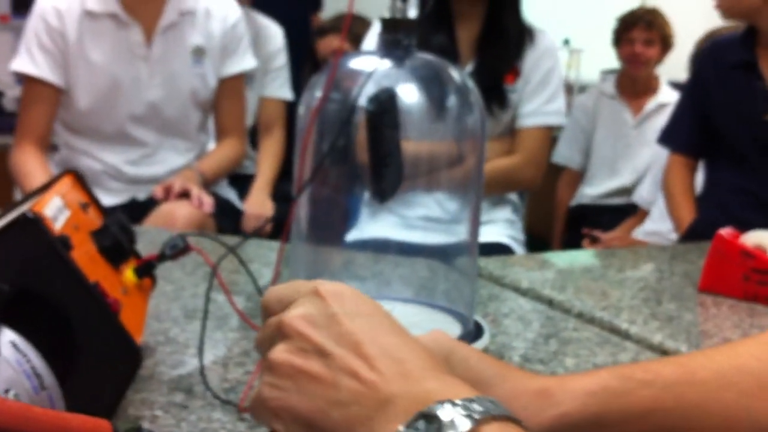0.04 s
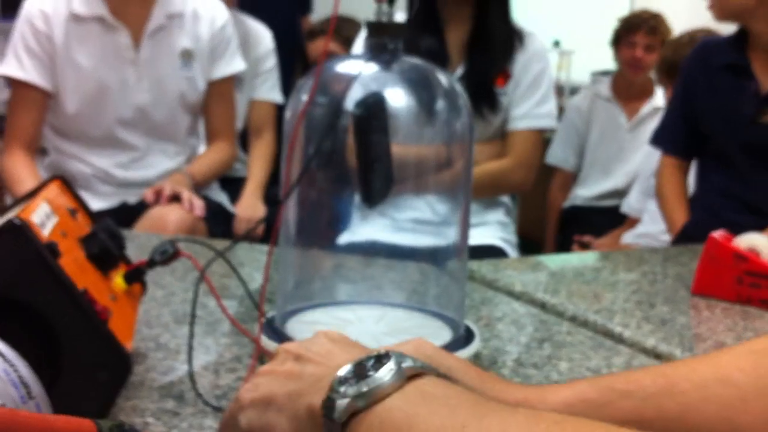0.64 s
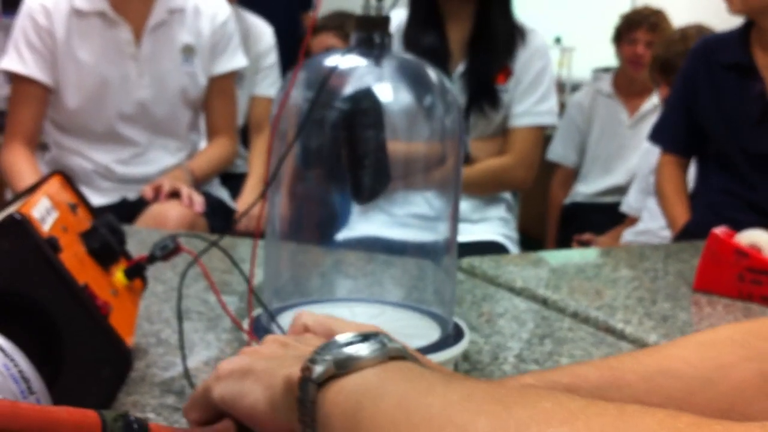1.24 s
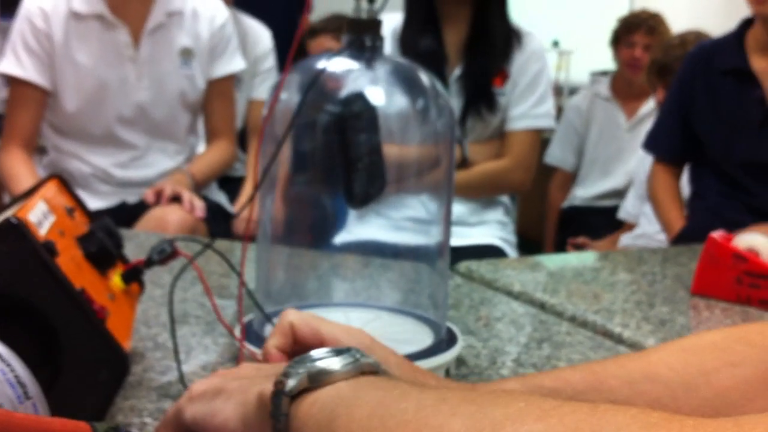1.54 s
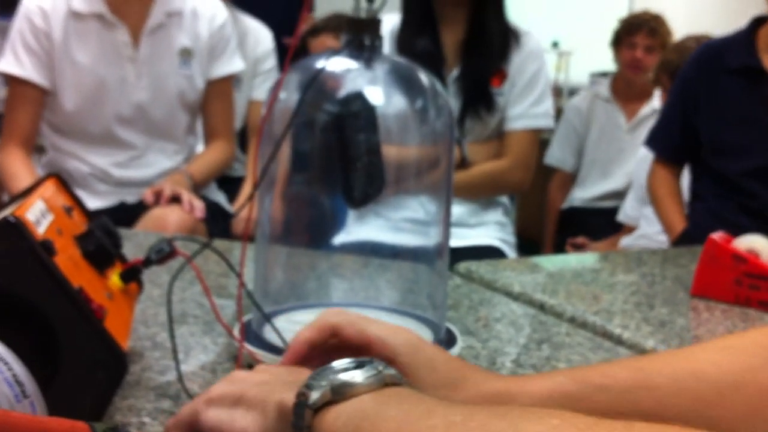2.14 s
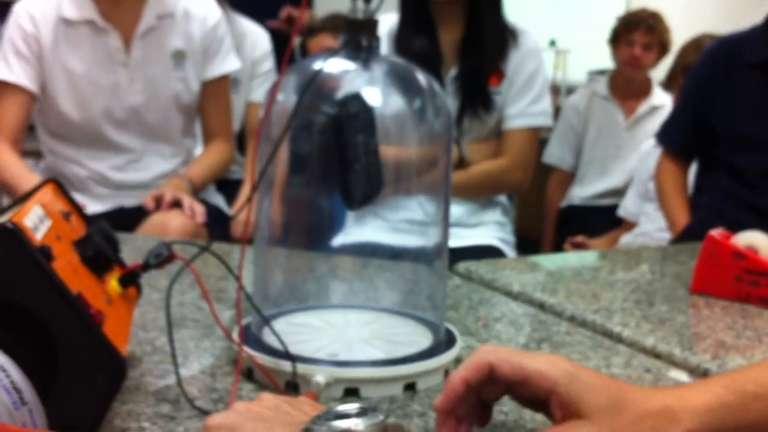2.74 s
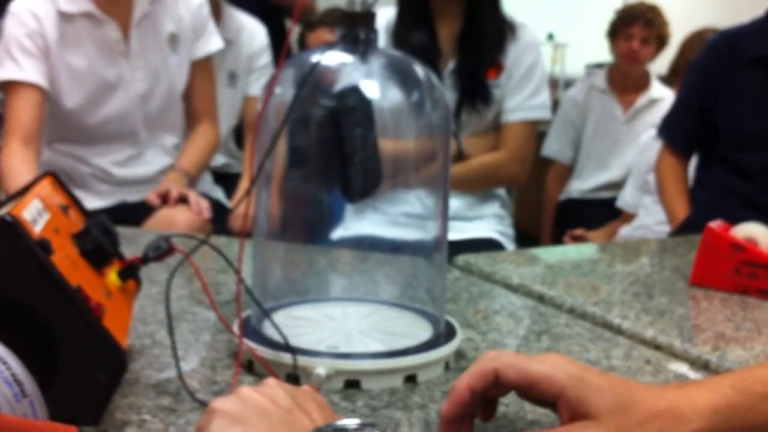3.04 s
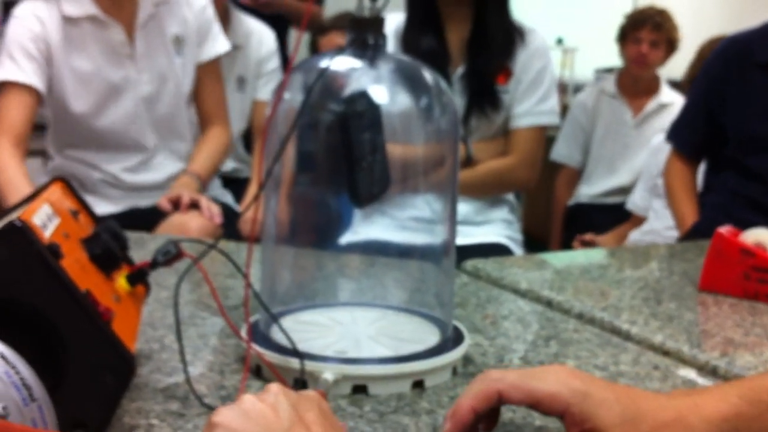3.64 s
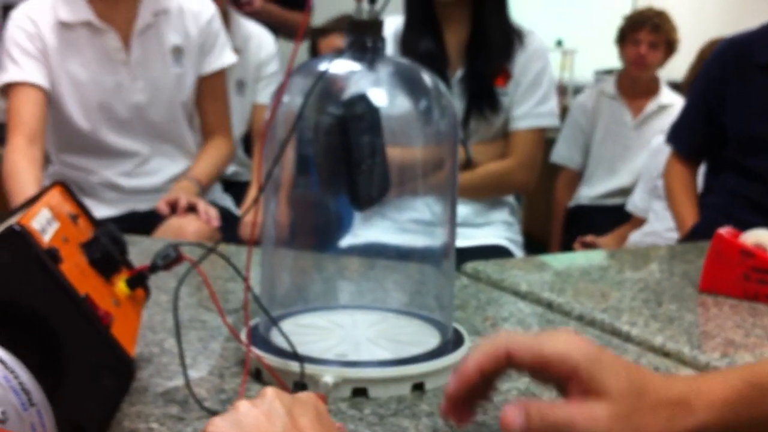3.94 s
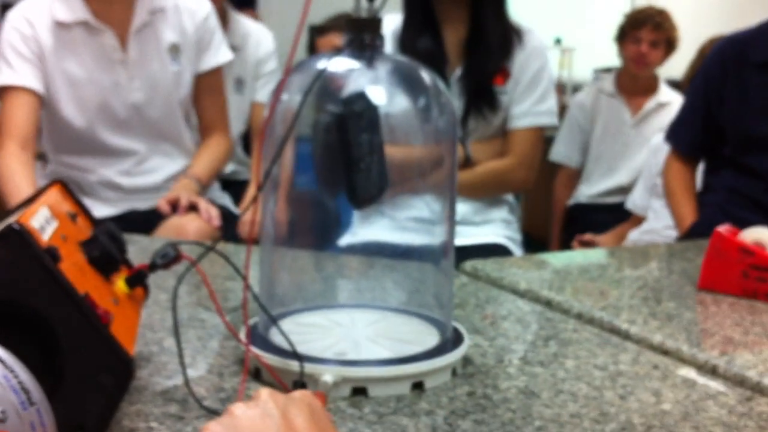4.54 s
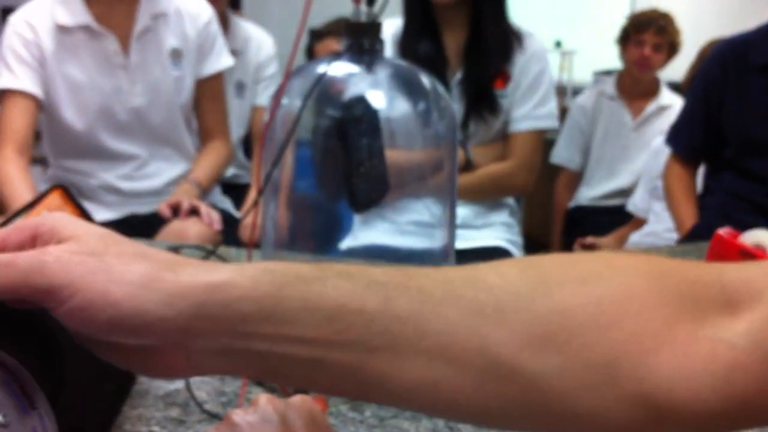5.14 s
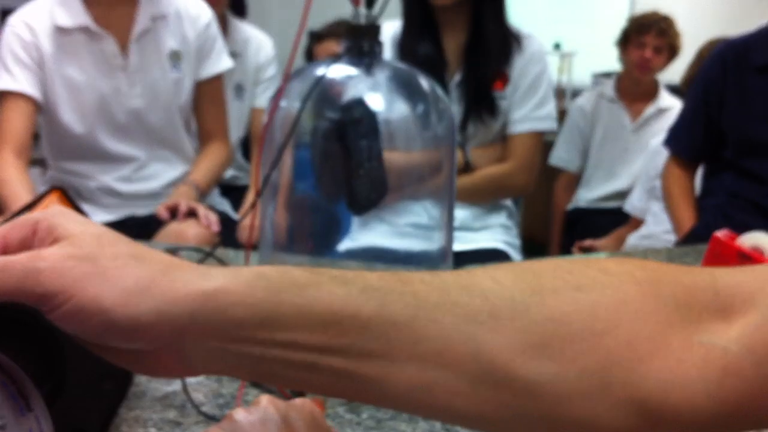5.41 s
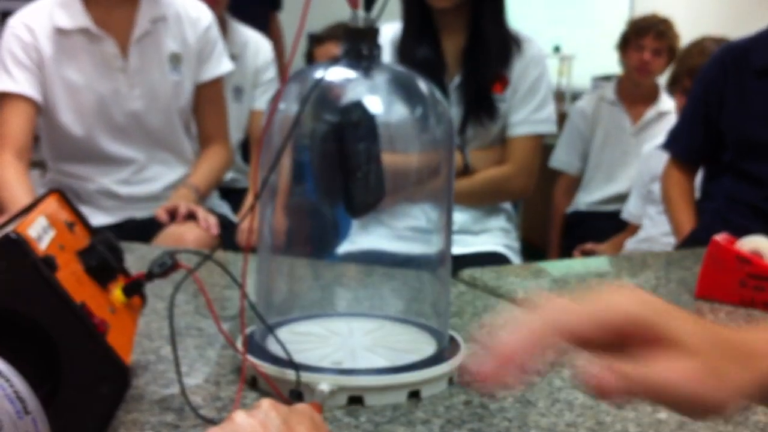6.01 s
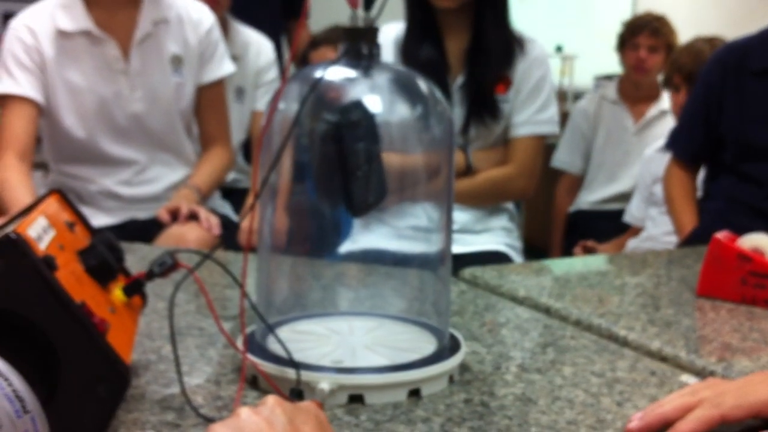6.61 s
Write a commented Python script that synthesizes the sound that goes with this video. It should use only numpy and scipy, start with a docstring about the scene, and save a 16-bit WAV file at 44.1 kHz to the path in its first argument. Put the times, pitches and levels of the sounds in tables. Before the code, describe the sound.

Fast metallic clatter and motor whine from a running vacuum pump, cut off by a sharp switch click and a brief rasp.

```python
"""Vacuum pump in a classroom

A small pump runs on a bench: its mains motor whines, a thin whistle wavers, and it clacks twice per
shaft turn, each clack ringing its metal casing. There is one soft bump, and after two seconds the
casing starts to rattle harder. A switch snaps, the shaft stalls in about a tenth of a second with a
last bright rasp, and the room's ventilation is left."""
import sys
import numpy as np
from scipy import signal
from scipy.fft import rfft, irfft, next_fast_len
from scipy.io import wavfile
from scipy.ndimage import map_coordinates

SR = 44100
rng = np.random.default_rng(int(sys.argv[2]) if len(sys.argv) > 2 else 0)


def transcribe(u):
    """Save the signal u as a 16-bit wav file named by the first command-line argument.

    u: samples, shape (n,) or (channels, n), limited to [-1, 1]; the rate is SR.
    q: integer samples, one column per channel.
    """
    v = np.clip(np.atleast_2d(u).T, -1, 1)
    q = np.round(v * 32767).astype(np.int16)
    wavfile.write(sys.argv[1], SR, q)


N = 298557

# Levels in the tables are relative. A fade_s is the time a sound takes to fall by 60 dB.
# Magnetic tones of the motor: shaft_multiple, mains_multiple, start_level_db, loaded_level_db
WHINE_TONES = [(30, 0, -61.5, -60), (29, 2, -64, -78), (30, 2, -52, -48.5), (29, 4, -63, -52),
               (30, 4, -60, -48), (30, 6, -56.5, -55), (0, 2, -63.5, -62.5)]
# Air stirred by the spinning motor: pitch_hz, level_db
MOTOR_AIR = [(300, -16), (600, -14.5), (900, -2.5), (1200, -11), (2000, -9.5), (2600, -13), (4500, -10.5),
             (7000, -26), (15000, -28.5)]
# Rush of the ventilation: pitch_hz, level_db
VENT_AIR = [(15, -74), (25, -49), (70, -25), (84, -18.5), (144, -3), (170, -4), (307, -5.5), (437, -16),
            (620, -7), (710, -11), (812, -10.5), (955, -13), (1280, -14.5), (2660, -29), (15800, -37)]
# Hum of the ventilation fan: pitch_hz, level_db
FAN_TONES = [(100, -65.5), (147, -64.5), (200, -63.5), (810, -68)]
# Pump strokes that barely catch: start_s, change_db
WEAK_STROKES = [(.04, -3.5), (.678, -5), (2.208, -6), (2.292, -22), (2.781, -8), (2.93, -6), (2.973, -4),
                (3.739, -3), (3.994, -4), (4.398, -20), (4.845, -6.5), (5.546, -15)]
# Notes the pump casing rings at: pitch_hz, width_hz, tight_level_db, loose_level_db
CASING_NOTES = [(1537, 120, -20.5, -16), (1778, 31, -15.5, -5), (2010.7, 34.7, -9, 3), (2134, 45, -26, -11),
                (2214, 25, -17.5, -12), (2685, 27.5, -10.5, -10.5), (3417, 130, -11, -10.5),
                (3643, 87, -10, -10.5), (3806, 32, -4.5, -6), (4140, 54, -13.5, -13),
                (4427, 46, -3.5, -1.6), (4553, 112, -16.5, -7), (4840, 104, -11.5, -18),
                (5130, 98, -11.5, -10.5), (5558, 55.5, -3.5, -4), (5854, 69, -4, 0.0), (6130, 60, -26, -11),
                (6400, 51, -10, -4), (6680, 130, -33.7, -14.5), (6940, 37, -18.5, -15.5),
                (7390, 44, -15.5, -11.5), (8570, 71, -47, -20), (8640, 67, -24, -27.5),
                (10560, 97, -29, -25.5), (11030, 110, -29, -30), (12040, 77, -42, -20),
                (13150, 260, -36, -24), (13660, 130, -33, -19), (14666, 202, -39, -29)]
# Gritty noise in each clack: pitch_hz, level_db
CLATTER_NOISE = [(1000, -44), (1500, -7.5), (2300, -16), (2900, -6), (3400, -3), (4600, -5), (6300, -10.5),
                 (7500, -4.5), (10500, -12.5), (11600, -20.5), (13400, -8), (15800, -36)]
# How long the classroom echoes: pitch_hz, fade_s
ROOM_FADE = [(200, 0.24), (2000, 0.4), (6000, 0.26), (14000, 0.11)]
# Crack of the switch: pitch_hz, level_db
SNAP_NOISE = [(240, -62), (400, -29), (812, -16), (1070, -11.5), (1600, -9), (2570, -19), (3720, -9),
              (4620, -31), (5470, -15), (6470, -15), (8410, -12.5), (15800, -24)]
# Notes the switch lever rings at: pitch_hz, level_db, fade_s
LEVER_NOTES = [(918, -3, 0.06), (1115, -8.5, 0.09), (1414, 9, 0.024), (1625, 6.5, 0.037), (3830, -9, 0.06)]
# Rasp of the stalling pump: pitch_hz, level_db
RASP_NOISE = [(410, -47), (700, -15), (862, -22), (1590, -16), (2070, -8.5), (2450, -15), (4400, -7.5),
              (4820, -8), (5640, -10), (13300, -13), (15800, -30)]
# Scrapes that make up that rasp: start_s, level_db, rise_s, fade_s
STALL_SCRAPES = [(5.637, -21.5, 0.0032, 0.073), (5.643, -16, 0.0086, 0.038), (5.661, -39, 0.0022, 0.11)]
# Metal parts that ring at the stall: pitch_hz, level_db, fade_s
STALL_NOTES = [(874, -12, 0.15), (2064, -9, 0.11), (3750, -5, .06), (4880, 8, 0.038), (5300, -20, 0.3),
               (7600, 4.5, 0.048), (8760, 1, .06), (10560, -6, 0.1)]

MAINS_HZ, RUN_HZ = 50, 23.523  # mains cycles and shaft turns per second
LOOSE_S, DRAG_HZ = 2.155, .019  # the casing shakes loose and slows the shaft a little
SNAP_S, POWER_OFF_S = 5.5542, 5.56
COAST_S, BRAKE_HZ_PER_S, REST_S = 5.549, 136, 5.66  # friction slows the shaft until it sticks


def amp(db):
    """Turn decibels into a gain to multiply by."""
    return 10 ** (np.asarray(db) / 20)


def unit(x):
    """Scale a sound to an average (rms) level of 1."""
    return x / np.sqrt(np.mean(x ** 2) + 1e-20)


def clock(size=N):
    """The time of each sample, in seconds."""
    return np.arange(size) / SR


def along(table, hz):
    """Read between the rows of a (pitch_hz, value) table, on a log pitch scale."""
    pitches, values = np.transpose(table)
    return np.interp(np.log(hz + 1), np.log(pitches + 1), values)


def wobble(rate):
    """A smooth curve through `rate` random points a second."""
    return map_coordinates(rng.standard_normal(int(N * rate / SR) + 4), [clock() * rate])


def filtered(x, gain_at):
    """Turn each frequency of x up or down by gain_at(hz)."""
    size = next_fast_len(N + SR // 2)
    return irfft(rfft(x, size) * gain_at(np.fft.rfftfreq(size, 1 / SR)), size)[:N]


def noise(table):
    """Noise at level 1, shaped by a (pitch_hz, level_db) table."""
    return unit(filtered(rng.standard_normal(N), lambda hz: amp(along(table, hz))))


def burst(t, rise_s, fade_s):
    """Loudness of a hit at t = 0: it rises fast, then dies away."""
    t = np.maximum(t, 0)
    return (1 - np.exp(-t / rise_s)) * np.exp(-np.log(1000) * t / fade_s)


def ringing(notes, start_s):
    """A struck part rings with several fading notes at once."""
    t = clock() - start_s
    return sum(amp(db) * burst(t, .001, fade_s) * np.sin(2 * np.pi * hz * t) for hz, db, fade_s in notes)


def shaft_speed(t):
    """Turns a second: steady under power, then slowing evenly until the shaft sticks."""
    running = RUN_HZ - DRAG_HZ * (t > LOOSE_S)
    return (running - BRAKE_HZ_PER_S * np.maximum(t - COAST_S, 0)) * (t < REST_S)


def shaft_turns():
    """How many turns the shaft has made so far."""
    return np.cumsum(shaft_speed(clock())) / SR


def motor(air_db=-49, waver_db=1.43):
    """Slots in the rotor pass through the mains field and whine; the spinning also stirs the air."""
    t, turns = clock(), shaft_turns()
    load = np.clip(t / POWER_OFF_S, 0, 1)
    whine = np.zeros(N)
    for shaft_multiple, mains_multiple, start_db, loaded_db in WHINE_TONES:
        cycles = shaft_multiple * turns + mains_multiple * MAINS_HZ * t + rng.random()
        level_db = start_db + load * (loaded_db - start_db) + waver_db * wobble(7)
        whine += np.sqrt(2) * amp(level_db) * np.sin(2 * np.pi * cycles)
    current = np.exp(-np.maximum(t - POWER_OFF_S, 0) / .0099)
    air = amp(air_db + 3.5 * load) * shaft_speed(t) / RUN_HZ * noise(MOTOR_AIR)
    return whine * current + air


def whistle(level_db=-60, pitch_hz=2690, width_hz=25):
    """A narrow band of noise makes a thin, wavering whistle while the shaft turns."""
    tone = filtered(rng.standard_normal(N), lambda hz: 1 / (1 + ((hz - pitch_hz) / width_hz) ** 2))
    return amp(level_db) * shaft_speed(clock()) / RUN_HZ * unit(tone)


def ventilation(air_db=-53.5):
    """A steady rush of air with a few unsteady fan tones."""
    hum = sum(amp(db + 3.3 * wobble(6)) * np.sin(2 * np.pi * hz * clock() + wobble(6))
              for hz, db in FAN_TONES)
    return amp(air_db) * noise(VENT_AIR) + hum


def stroke_times(limp_s=.00026, jitter_s=.000045):
    """The pump clacks twice a turn, with a slight limp: one early, the next late."""
    strokes_done = np.floor(2 * shaft_turns() - .795)  # the first clack is .795 of a stroke in
    times = np.flatnonzero(np.diff(strokes_done)) / SR
    return times - limp_s * (-1) ** np.arange(len(times)) + rng.normal(0, jitter_s, len(times))


def stroke_force_db(times, start_db=-.44, build_db_per_s=.58, coast_db_per_hz=.2, chance_db=.94):
    """Clacks harden as the vacuum builds, level off once the casing is loose, and soften with speed."""
    build_db = (start_db + build_db_per_s * times) * (times < LOOSE_S)
    force_db = build_db - coast_db_per_hz * (RUN_HZ - shaft_speed(times))
    for start_s, change_db in WEAK_STROKES:
        force_db[np.argmin(abs(times - start_s))] += change_db
    return force_db + rng.normal(0, chance_db, len(times))


def sharp_start(power):
    """Spectrum of the quickest-starting sound with this power at each frequency."""
    cepstrum = irfft(np.log(power + 1e-12) / 2)
    half = cepstrum.shape[-1] // 2
    fold_forward = np.r_[1, np.full(half - 1, 2), 1, np.zeros(half - 1)]
    return np.exp(rfft(cepstrum * fold_forward))


def metal_smear(hz, width_hz=345, count=16):
    """Many paths through the metal spread a hit over a few milliseconds without changing its tone."""
    centres = np.geomspace(1500, 15000, count)[:, None] * np.exp(rng.normal(0, .03, (count, 1)))
    pole = centres ** 2 - hz ** 2 + 1j * hz * width_hz * np.sqrt(centres / np.median(centres))
    return np.prod(pole.conj() / pole, axis=0)


def casing_rings(loose, size, steepness=1.66):
    """One ring per stroke: the casing's notes are mixed one way when tight, another when loose."""
    pitch_hz, width_hz, tight_db, loose_db = np.transpose(CASING_NOTES)
    hz = np.fft.rfftfreq(size, 1 / SR) + 1e-6
    off_pitch = (hz ** 2 - pitch_hz[:, None] ** 2) / (hz * steepness * width_hz[:, None])
    peaks = (1 + off_pitch ** 2) ** -steepness  # steep sides keep the gaps between notes quiet
    gains = np.outer(1 - loose, amp(tight_db)) + np.outer(loose, amp(loose_db))
    gains *= amp(rng.normal(0, 1, gains.shape))
    return irfft(sharp_start(gains ** 2 @ peaks) * metal_smear(hz))


def pump(ring_db=12, clatter_db=-41, tick_db=-42, uneven_db=1, gritty_db=2):
    """Every stroke rings the casing, with a tick and a little fresh clatter on top."""
    times, t = stroke_times(), clock(4096)
    loose = (times > LOOSE_S).astype(float)
    # Every other stroke is grittier and, while the casing is tight, harder too.
    side = (-1) ** np.arange(len(times))
    force_db = stroke_force_db(times) + uneven_db * side * (1 - loose)
    rings = casing_rings(loose, len(t))
    clatter = amp(clatter_db) * burst(t, rise_s=.0008, fade_s=.04)
    tick = amp(tick_db) * burst(t - .0004, rise_s=.0002, fade_s=.016)
    grit_db = gritty_db * side - 4 * (1 - loose) + rng.normal(0, 1, len(times))
    hiss = np.pad(noise(CLATTER_NOISE), (0, len(t)))
    clacks = np.zeros(N + len(t))
    for start_s, force, grit, ring in zip(times, amp(force_db), amp(grit_db), rings):
        span = slice(round(start_s * SR), round(start_s * SR) + len(t))
        clacks[span] += force * (amp(ring_db) * ring + grit * (clatter + tick) * hiss[span])
    return clacks[:N]


def room_echo(x, delay_samples=180):
    """The classroom gives a short echo in which the highest sounds die first."""
    hz, t, spectrum = signal.stft(rng.standard_normal(SR // 2), SR, nperseg=256)
    fade = np.exp(-np.log(1000) * t / along(ROOM_FADE, hz)[:, None])
    _, tail = signal.istft(spectrum * fade, SR, nperseg=256)
    return signal.fftconvolve(np.pad(x, (delay_samples, 0)), tail / np.linalg.norm(tail))[:N]


def bump(start_s=1.835, level_db=-35, low_hz=170, high_hz=300):
    """A soft, dull knock on the bench: two low notes that fade fast."""
    t = clock() - start_s
    notes = np.sin(2 * np.pi * low_hz * t) + .33 * np.sin(2 * np.pi * high_hz * t)
    return amp(level_db) * burst(t, rise_s=.0037, fade_s=.17) * notes


def switch(crack_db=-15, ring_db=-24):
    """The switch snaps over: a hard crack and a short ring of its lever."""
    crack = burst(clock() - SNAP_S, rise_s=.00015, fade_s=.02) * noise(SNAP_NOISE)
    return amp(crack_db) * crack + amp(ring_db) * ringing(LEVER_NOTES, SNAP_S)


def stall(ring_db=-29):
    """The pump stops with a short, bright rasp that leaves metal parts ringing."""
    scrapes = sum(amp(db) * burst(clock() - start_s, rise_s, fade_s)
                  for start_s, db, rise_s, fade_s in STALL_SCRAPES)
    second_scrape_s = STALL_SCRAPES[1][0]
    return scrapes * noise(RASP_NOISE) + amp(ring_db) * ringing(STALL_NOTES, second_scrape_s)


def scene():
    """Mix everything into one channel; only the sharp sounds get an echo."""
    sharp = pump() + switch() + stall()
    echo = amp(-17) * room_echo(sharp)
    return (sharp + echo + motor() + whistle() + bump() + ventilation())[None]


def record(dry):
    """Cut away the very highest treble."""
    top_hz = 15950
    return filtered(dry[0], lambda hz: hz < top_hz)[None]


dry = scene()
out = record(dry)
transcribe(out)
```